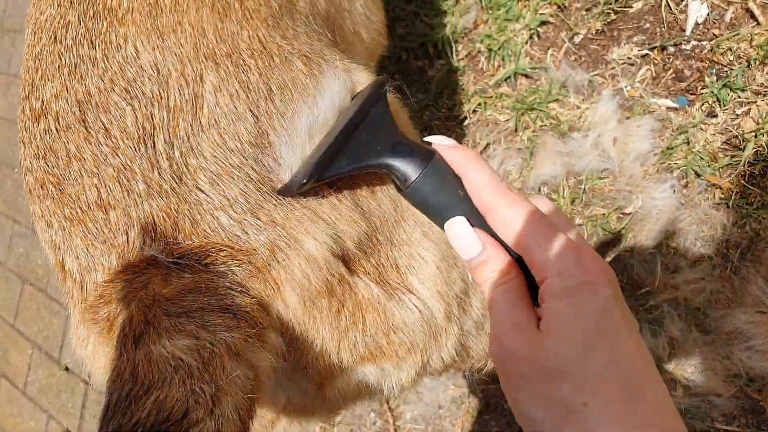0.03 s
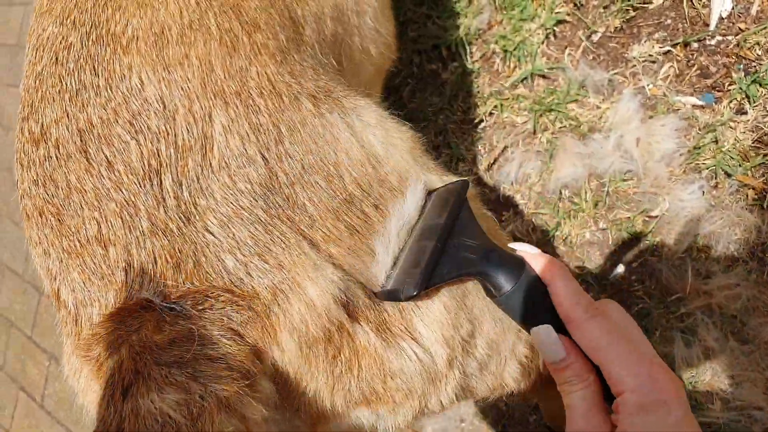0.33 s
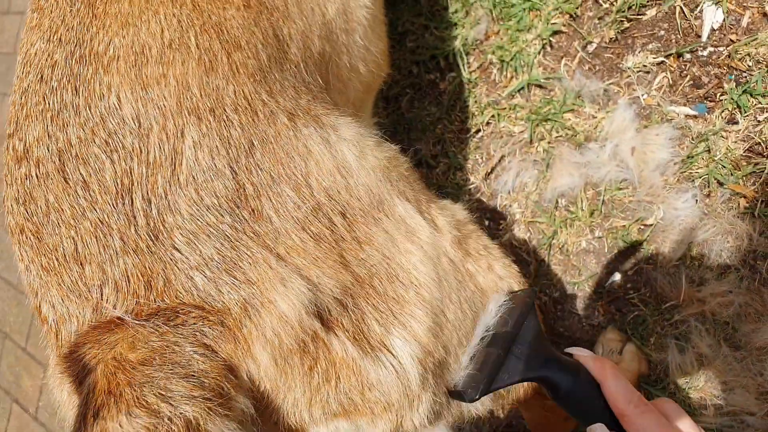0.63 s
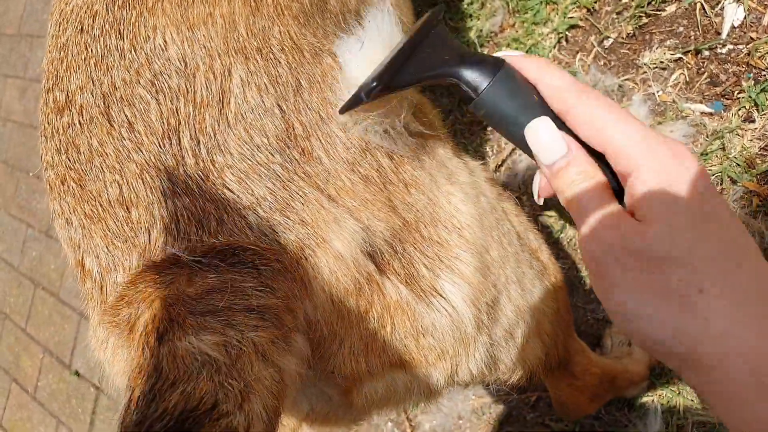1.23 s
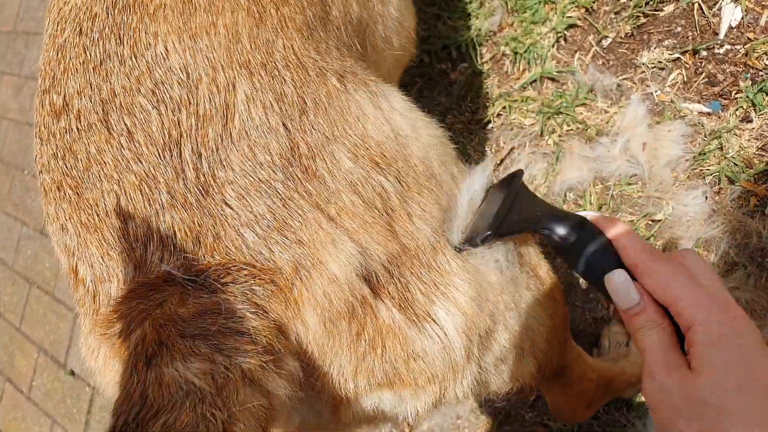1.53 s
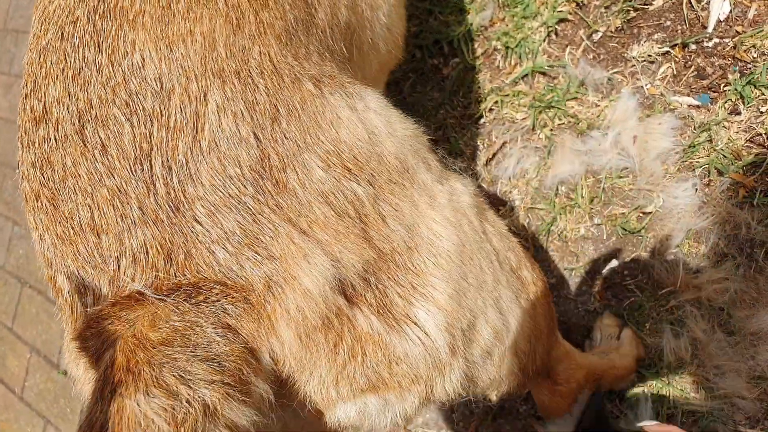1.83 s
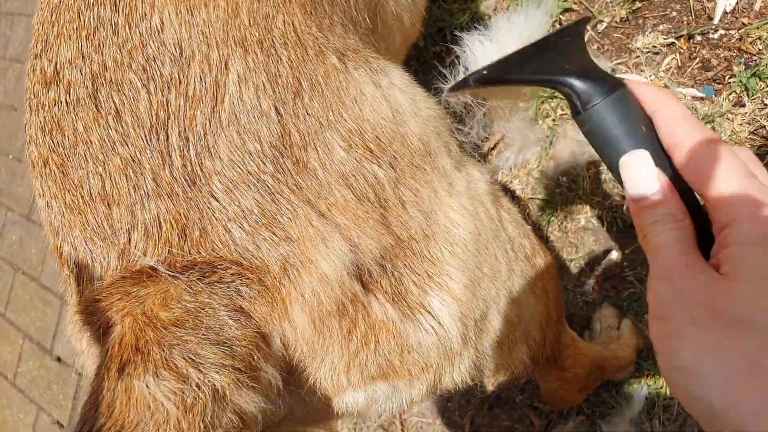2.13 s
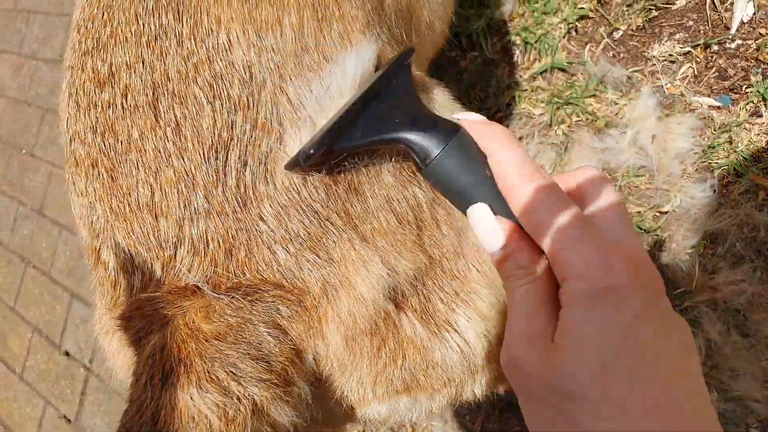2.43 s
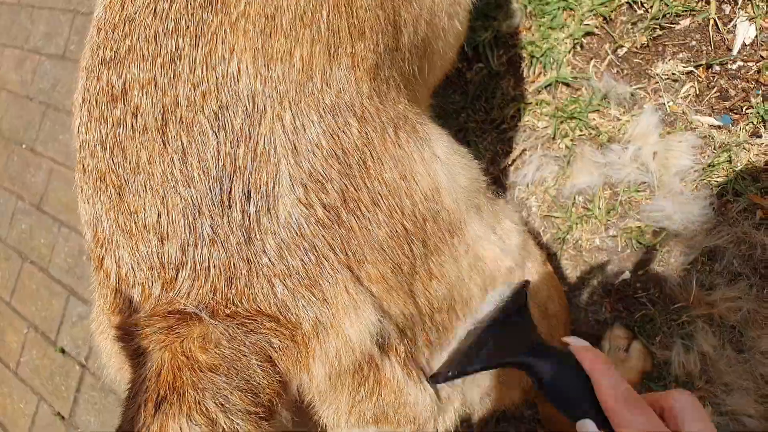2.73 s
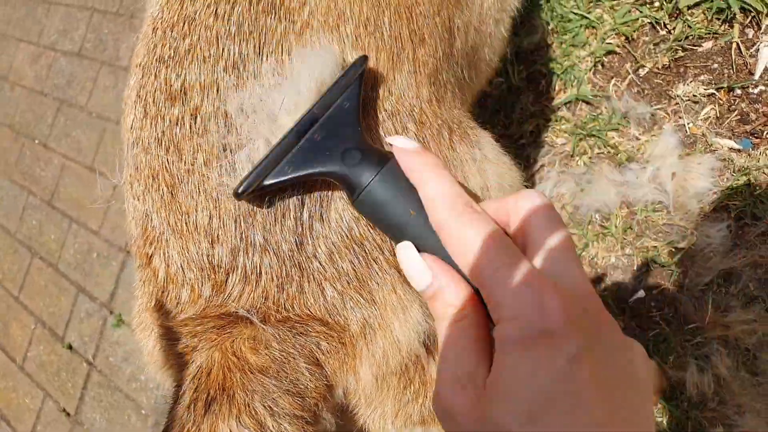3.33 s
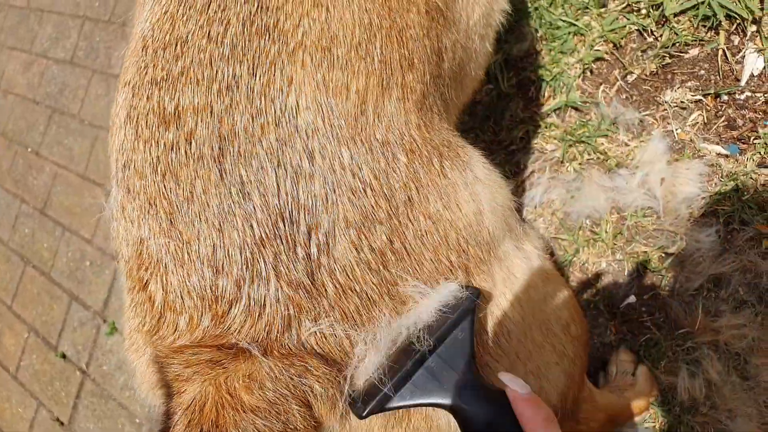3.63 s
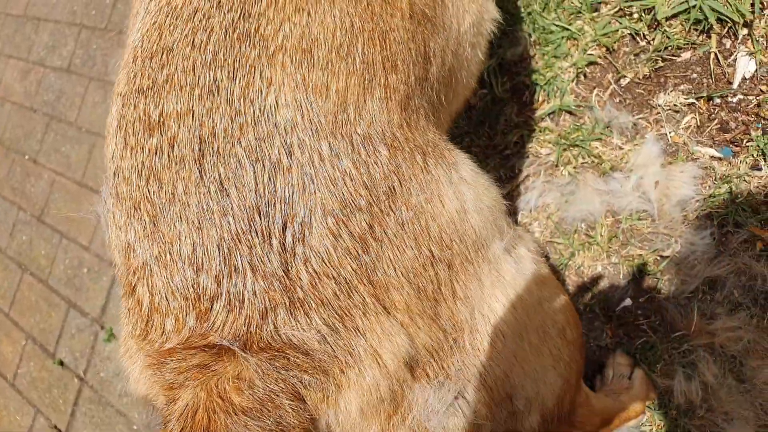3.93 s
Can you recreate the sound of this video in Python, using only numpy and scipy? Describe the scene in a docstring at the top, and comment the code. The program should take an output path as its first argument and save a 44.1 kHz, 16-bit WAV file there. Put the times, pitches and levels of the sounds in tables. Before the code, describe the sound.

Close, quiet brushing of a dog's fur outdoors: four rasping strokes with a fine hiss and a few tiny snags. A bird chirps briefly, mostly early on, and low wind buffets the microphone more strongly in the second half.

```python
"""In a softly rumbling garden, a stiff brush is drawn through a dog's coat, close by. Hairs slip off
its teeth in dense tiny clicks: a rasp with a fine hiss above it. At once a small bird whistles the
first of four echoing chirps. As the first of four brush strokes ends, wind rumbles on the two
microphone openings, and there is a faint far hoot and a soft knock. A second hoot follows. Later the
teeth snag and tick a few times, while the wind rises in gusts and thumps."""
import sys
import numpy as np
from scipy import signal
from scipy.fft import rfft, irfft
from scipy.io import wavfile
from scipy.ndimage import uniform_filter1d, map_coordinates

SR = 44100
rng = np.random.default_rng(int(sys.argv[2]) if len(sys.argv) > 2 else 0)


def dump_mix(stems):
    """Bounce the given channels to the path in sys.argv[1] as a 16-bit WAV at rate SR."""
    frames = np.atleast_2d(stems).T  # one column per channel
    limited = np.clip(frames, -1, 1)  # hard clip at full scale
    pcm = np.round(limited * 32767).astype(np.int16)
    wavfile.write(sys.argv[1], SR, pcm)


N = 176400

# A "tone" table says how strong each pitch is in a noise. A side_db is left level minus right level.
# Tone of the distant rumble: pitch_hz, relative_db
RUMBLE_TONE = [(20,-23.5),(50,-0.5),(140,-1),(260,-12),(1400,-39),(15500,-72)]
# Tone of the breeze's soft rush: pitch_hz, relative_db
BREEZE_TONE = [(200,10),(1400,-1.5),(2200,-14),(6000,-20.5),(16000,-46)]
# How the rush swells: time_s, level_db
BREEZE_LEVELS = [(0,-67.5),(1.05,-65),(1.75,-62),(2.95,-62),(3.18,-57.5),(4,-61.5)]
# Brush strokes (the first two rows overlap into one):
# start_s, end_s, rasp_db, hiss_db, hiss_side_db, ring_depth (multiplies the boost_db below)
STROKES = [(0.005,0.49,-67.5,-71.5,1.5,0.66),(0.41,0.782,-64,-71.5,1.5,1.03),(1.312,1.835,-72.5,-68,0,1.9),(2.326,2.858,-61.5,-63.5,6,0.87),(3.3,3.898,-62,-66,2,1.36)]
# Ringing of the teeth and the brush's hollow head: pitch_hz, width_hz, boost_db
BRUSH_RINGS = [(2300,380,10),(3100,340,9.5),(4680,450,5),(6400,650,6.5)]
# Tone of the rasp: pitch_hz, relative_db
RASP_TONE = [(600,-8),(1900,-5.5),(4600,-3),(6800,-6.5),(8200,-15.5),(14000,-32)]
# Tone of the fine hiss: pitch_hz, relative_db
HISS_TONE = [(4000,-8.5),(8500,-2.5),(9700,1.5),(12400,-3),(14000,-2),(15600,-8.5)]
# Quiet rustle under and between the strokes: time_s, level_db
RUSTLE_LEVELS = [(0,-75),(.8,-72),(1.05,-88.5),(1.3,-70.5),(1.85,-69.5),(2.03,-81),(2.25,-76),(4,-69.5)]
# Each chirp's main note, then how much quieter its lead-in and closing note are:
# start_s, length_s, level_db, lead_relative_db, close_relative_db, main_pitch_hz
CHIRPS = [(0.058,0.034,-44.5,-24,-16,5870),(0.6,0.043,-44.5,-27,-9.5,5790),(1.244,0.0474,-48.5,-16,-10,5810),(2.981,0.042,-46.5,-7.5,-10,5835)]
# Walls that throw the main note back: delay_s, relative_db
WALL_ECHOES = [(.054,-16),(.112,-18)]
# Wind on the two microphone openings: time_s, left_db, right_db
WIND_LEVELS = [(0,-70,-70.5),(.75,-52,-48),(1.07,-72,-78),(1.26,-41.5,-48.5),(1.39,-54.5,-59),(1.58,-47,-31),(1.76,-36,-32.5),(1.94,-45.5,-38),(2.03,-57.5,-49.5),(2.32,-44,-43.5),(2.45,-33,-31.5),(2.72,-58,-30),(2.92,-40.5,-38),(3.06,-30,-36.5),(3.2,-43,-30.5),(3.42,-33,-29.5),(3.66,-26.5,-40),(4,-42,-36.5)]
# Tone of the wind's rumble: pitch_hz, relative_db
WIND_TONE = [(20,-30),(35,-9.5),(55,7),(85,6),(130,-6),(200,-14.5),(500,-51),(3000,-85)]
# Tone of the rougher, higher flutter in strong wind: pitch_hz, relative_db
ROUGH_TONE = [(90,-32),(210,-1.5),(450,-13.5),(2000,-49.5)]
# Single swirls of air that hit an opening: peak_s, half_length_s, level_db, side_db, pitch_hz
SWIRLS = [(1.453,0.022,-39,-17,88),(1.915,0.015,-35,-18.5,66),(2.464,0.026,-29,-19,89),(3.046,0.035,-36,16.5,80.6),(3.329,0.019,-39.5,-18.5,155),(3.448,0.018,-34,17.5,128),(3.656,0.015,-38.5,13,169),(3.729,0.016,-34,19,129)]
# Far hoots: start_s, length_s, pitch_hz, level_db
HOOTS = [(0.741,0.05,633,-59.5),(1.117,0.089,622,-66.5)]
# Ringing notes of the knock: pitch_hz, relative_db, fade_s (time to drop 60 dB)
KNOCK_RINGS = [(554,-4,0.039),(785,15.5,0.005),(1184,-5,0.075)]
# Teeth snagging and flicking free: start_s, decay_s, pitch_hz, level_db
SNAGS = [(1.249,0.013,3200,-63),(1.803,0.021,8450,-61.5),(2.132,0.016,2400,-64.5),(3.247,0.017,9400,-69)]

HAIRS_PER_S, DRIFT_HZ = 11000, 7.2
RASP_RISE_S, HISS_RISE_S, LIFT_S, HISS_SWEEP_DB = 0.13, 0.099, 0.055, 11
LEAD_S, CLOSE_S, CLOSE_AFTER_S, ECHO_FADE_S = 0.055, 0.061, 0.072, 0.4
BUZZ_RATE_HZ, BUZZ_DEPTH_HZ, WAVER_HZ = 160, 110, 264.5
FLUTTER_DB, STRONG_WIND_DB = 3.5, -27.5
KNOCK_START_S, KNOCK_RISE_S, KNOCK_DB = 0.7893, 0.00087, -47.5

TIME_S = np.arange(N) / SR
PITCHES_HZ = np.arange(N // 2 + 1) * SR / N


def gain(db):
    """Turn decibels into a number to multiply by."""
    return 10 ** (np.asarray(db) / 20)


def curve(rows, column=1):
    """Join a table's values with straight lines in time."""
    rows = np.array(rows)
    return np.interp(TIME_S, rows[:, 0], rows[:, column])


def pan(side_db):
    """Left and right gains; above zero leans left."""
    return gain(np.array([[1], [-1]]) * side_db / 2)


def noise(channels=2):
    """Separate white noise for each channel."""
    return rng.standard_normal((channels, N))


def shape(sound, tone):
    """Give a sound a tone and set its strength to 1."""
    hz, db = np.array(tone).T
    tone_db = np.interp(np.log(PITCHES_HZ + 1), np.log(hz), db)
    shaped = irfft(rfft(sound) * gain(tone_db), N)
    return shaped / np.std(shaped)


def stereo(three, shared):
    """Mix one shared and two separate sounds into left and right."""
    return np.sqrt(shared) * three[0] + np.sqrt(1 - shared) * three[1:]


def wander(rate_hz):
    """A smooth random wobble, typically of size 1."""
    wobble = irfft(rfft(rng.standard_normal(N)) * np.exp(-(PITCHES_HZ / rate_hz) ** 2), N)
    return wobble / np.std(wobble)


def garden():
    """A low distant rumble and a soft rush that swells with the breeze."""
    rumble_db = -56 + 3.3 * wander(rate_hz=3.3)
    rumble = gain(rumble_db) * shape(stereo(noise(channels=3), shared=0.96), RUMBLE_TONE)
    return rumble + gain(curve(BREEZE_LEVELS)) * shape(noise(), BREEZE_TONE)


def hair_clicks():
    """Three streams of tiny, uneven clicks as hairs slip off the teeth."""
    size = gain(2 * rng.exponential(size=(3, N)))
    slips = rng.random((3, N)) < HAIRS_PER_S / SR
    return slips * size * np.sign(noise(channels=3))


def teeth_rasp(ring_depth):
    """Hair clicks make the brush ring; its pitches drift as the coat presses on it."""
    boost_db = sum(db / (1 + (2 * (PITCHES_HZ - hz) / width) ** 2) for hz, width, db in BRUSH_RINGS)
    clicks = stereo(hair_clicks(), shared=0.15)
    ringing = irfft(rfft(clicks) * gain(ring_depth * boost_db), N)
    rasp = shape(ringing, RASP_TONE)
    position = np.cumsum(1 + 0.007 * wander(DRIFT_HZ))  # uneven speed bends the pitch
    return np.array([map_coordinates(side, [position], mode="mirror") for side in rasp]) * pan(7.5)


def hair_hiss():
    """The fine top of the hair clicks; each band of pitches shimmers on its own."""
    spectrum = rfft(shape(hair_clicks()[1:], HISS_TONE))
    band = np.minimum(PITCHES_HZ // 2000, 7)
    return sum(irfft(spectrum * (band == k), N) * gain(1.1 * wander(DRIFT_HZ)) for k in np.unique(band))


def contact(start, end, rise_s):
    """How firmly the teeth touch, from 0 to 1: they sink in, then lift off."""
    sink = np.sin(np.pi / 2 * np.clip((TIME_S - start) / rise_s, 0, 1)) ** 2
    return sink * np.clip((end - TIME_S) / LIFT_S, 0, 1)


def brush():
    """Strokes with uneven drag: the hiss comes first and moves right; the rasp swells just after."""
    rustle = gain(curve(RUSTLE_LEVELS))
    rasp = rustle * teeth_rasp(ring_depth=0.17)
    hiss_level = rustle * gain(-14)
    for start, end, rasp_db, hiss_db, side_db, ring_depth in STROKES:
        along = np.clip(2 * (TIME_S - start) / (end - start) - 1, -1, 1)  # -1 at the start, 1 at the end
        rasp_swell = contact(start, end, RASP_RISE_S) * gain(rasp_db - 4 * along ** 2)
        hiss_swell = contact(start, end, HISS_RISE_S) * gain(hiss_db - 5 * along ** 2)
        rasp = rasp + rasp_swell * teeth_rasp(ring_depth)
        hiss_level = np.hypot(hiss_level, hiss_swell * pan(side_db - HISS_SWEEP_DB * along / 2))
    hiss = hiss_level * hair_hiss()
    drag = gain(0.92 * wander(rate_hz=22))
    return drag * (rasp + hiss)


def whistle(start, length, middle_hz, arch_hz=0, slide_hz=0, wobble_hz=0):
    """One note whose pitch can arch and slide, with a faint octave above."""
    along = np.clip(2 * (TIME_S - start) / length - 1, -1, 1)
    pitch_hz = middle_hz - arch_hz * along ** 2 + slide_hz * along / 2 + wobble_hz
    phase = 2 * np.pi * np.cumsum(pitch_hz) / SR
    return (1 - along ** 2) * (np.sin(phase) + gain(-36.5) * np.sin(2 * phase))


def garden_echo(sound):
    """The garden scatters a sound into a fading tail."""
    tail = noise() * np.exp(-np.log(1000) * TIME_S / ECHO_FADE_S)
    return signal.fftconvolve(sound[None], tail / np.linalg.norm(tail[0]), axes=1)[:, :N]


def bird():
    """A buzzy falling lead-in, a clear two-voiced note and a blurred closing note, with echoes."""
    waver = WAVER_HZ * wander(rate_hz=300)
    buzz = BUZZ_DEPTH_HZ * np.sin(2 * np.pi * BUZZ_RATE_HZ * TIME_S) + waver
    rough_buzz = buzz + waver * wander(rate_hz=900)
    lead = main = close = 0
    for start, length, db, lead_db, close_db, hz in CHIRPS:
        fade_in = np.clip(2 * (TIME_S - start + LEAD_S) / LEAD_S, 0, 1)
        falling = whistle(start - LEAD_S, LEAD_S, middle_hz=7000, slide_hz=-700, wobble_hz=rough_buzz)
        upper = whistle(start, length, hz, arch_hz=135, slide_hz=-140, wobble_hz=0.14 * waver)
        lower = whistle(start - length / 2, 2 * length, middle_hz=5520, arch_hz=650, wobble_hz=waver)
        blurred = whistle(start + CLOSE_AFTER_S, CLOSE_S, middle_hz=5290, arch_hz=1200, wobble_hz=buzz)
        lead = lead + gain(db + lead_db) * fade_in * falling
        main = main + gain(db) * (upper + gain(-12.5) * lower)
        close = close + gain(db + close_db) * blurred
    direct = lead + main + close / np.sqrt(2)
    echo = garden_echo(lead / np.sqrt(2) + main + close)  # leaves soak up more of the high lead-in
    walls = sum(gain(db) * np.interp(TIME_S - delay, TIME_S, main) for delay, db in WALL_ECHOES)
    return (direct + walls + gain(-4.5) * echo) * pan(4.5)


def churning_air(tone, smooth_s=0.08):
    """Low noise of even strength, separate on each microphone opening."""
    air = shape(noise(), tone)
    power = uniform_filter1d(air ** 2, int(smooth_s * SR))
    power = uniform_filter1d(power, int(smooth_s * SR / 2))
    return air / np.sqrt(power)


def wind(fall_db_per_octave=19.5):
    """Gusts rumble on each opening, rougher when strong; single swirls thump at their own pitch."""
    level_db = np.array([curve(WIND_LEVELS, side) + FLUTTER_DB * wander(rate_hz=10) for side in (1, 2)])
    thumps = 0
    for peak, half_length, db, side_db, hz in SWIRLS:
        swell = np.exp(-((TIME_S - peak) / half_length) ** 2)
        tone = [(hz / 4, -2 * fall_db_per_octave), (hz, 0), (hz * 2 ** 10, -10 * fall_db_per_octave)]
        thumps = thumps + gain(db) * pan(side_db) * swell * churning_air(tone)
    rough = gain(-58 + 1.07 * (level_db - STRONG_WIND_DB)) * shape(noise(), ROUGH_TONE)
    return gain(level_db) * churning_air(WIND_TONE) + rough + thumps


def hoots():
    """Two faint, low hoots from far away."""
    return sum(gain(db) * whistle(start, length, hz) for start, length, hz, db in HOOTS)


def knock():
    """One soft, hollow knock that rings briefly as the first stroke ends."""
    age = np.maximum(TIME_S - KNOCK_START_S, 0)
    ring = sum(gain(KNOCK_DB + db) * np.sin(2 * np.pi * hz * age) * np.exp(-np.log(1000) * age / fade_s)
               for hz, db, fade_s in KNOCK_RINGS)
    return ring * np.minimum(age / KNOCK_RISE_S, 1)


def snags(fall_db_per_octave=17):
    """A tuft catches and lets go: a soft tick of noise around its own pitch."""
    ticks = 0
    for start, decay_s, hz, db in SNAGS:
        fade = (TIME_S > start) * np.exp(-np.abs(TIME_S - start) / decay_s)
        tone = [(hz / 4, -2 * fall_db_per_octave), (hz, 0), (hz * 4, -2 * fall_db_per_octave)]
        ticks = ticks + gain(db) * fade * shape(noise(), tone)
    return ticks * pan(3.2)


def scene():
    """Add the close brushing sounds and the outdoor sounds together."""
    return brush() + snags() + knock() + bird() + hoots() + wind() + garden()


def record(dry):
    """Cut away the very highest treble."""
    top_hz = 15650
    return signal.sosfilt(signal.ellip(10, 0.2, 70, top_hz, fs=SR, output="sos"), dry)


dry = scene()
out = record(dry)
dump_mix(out)
```